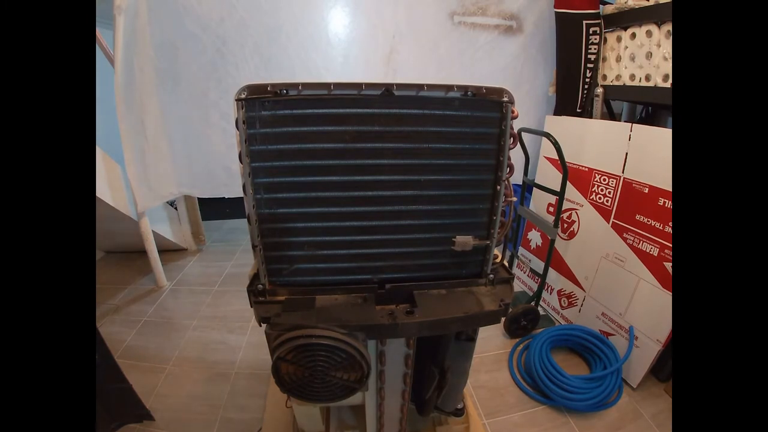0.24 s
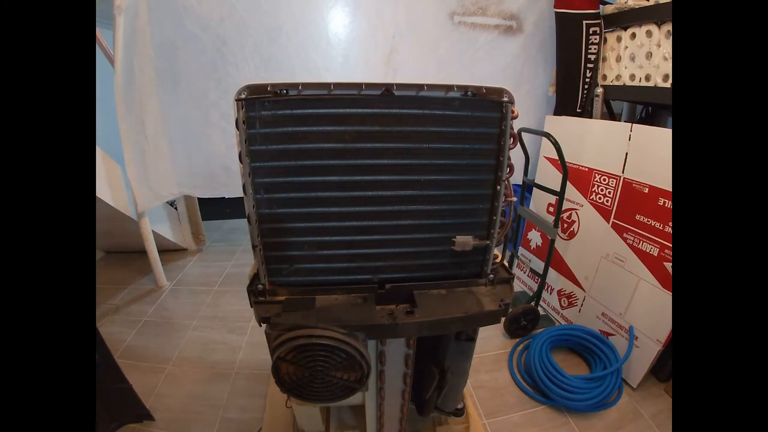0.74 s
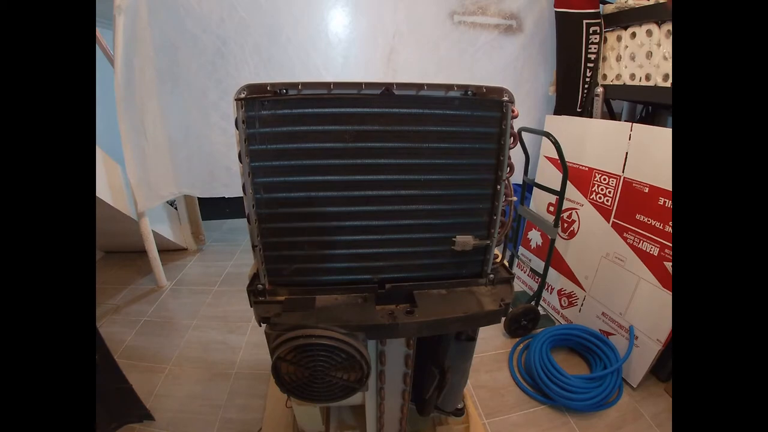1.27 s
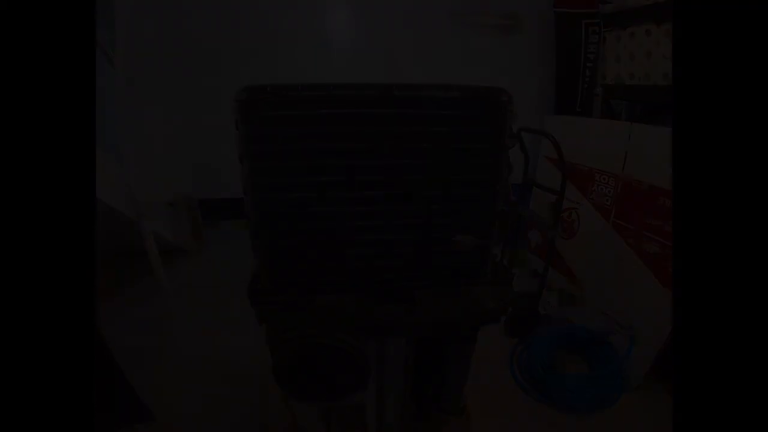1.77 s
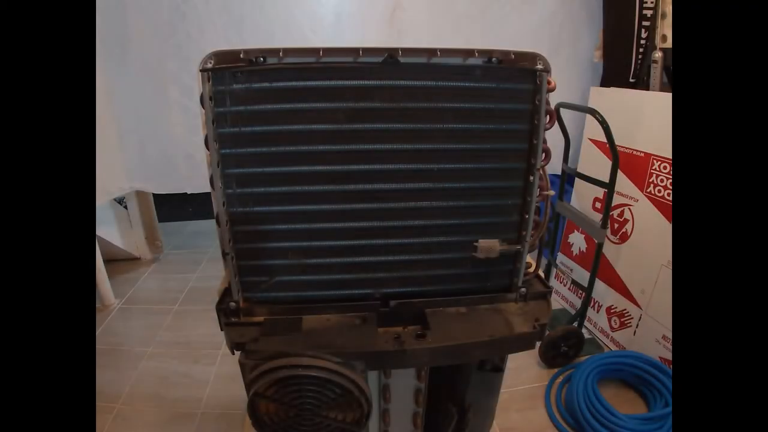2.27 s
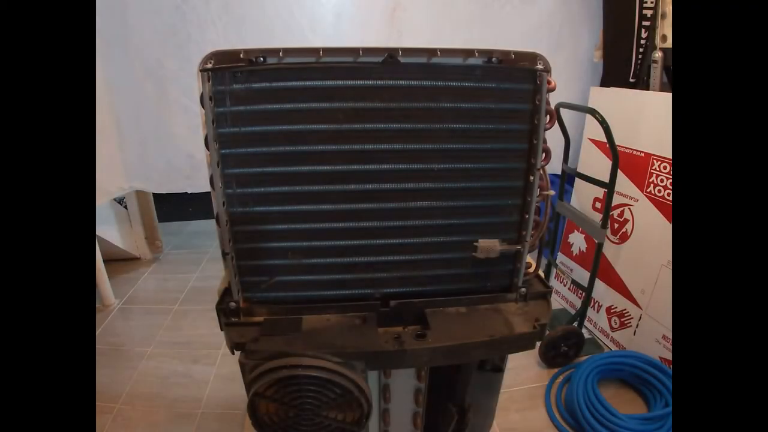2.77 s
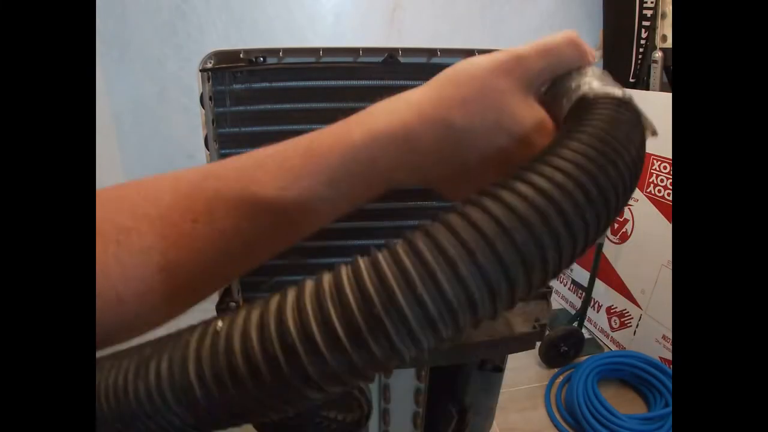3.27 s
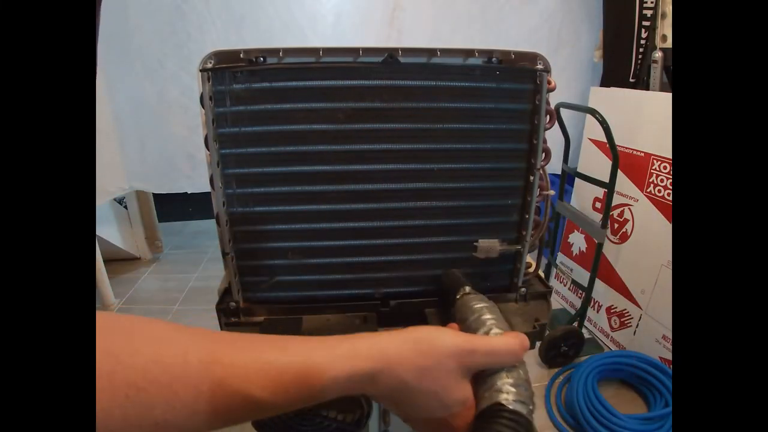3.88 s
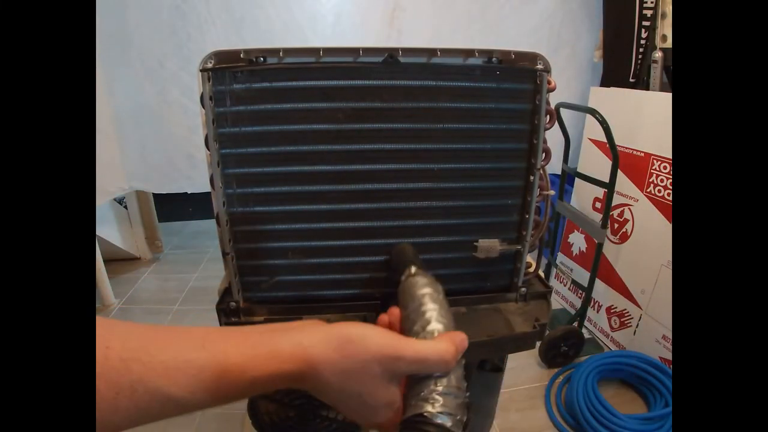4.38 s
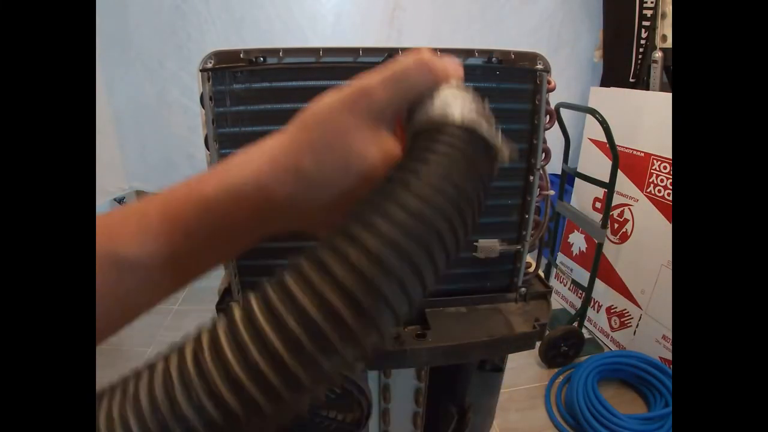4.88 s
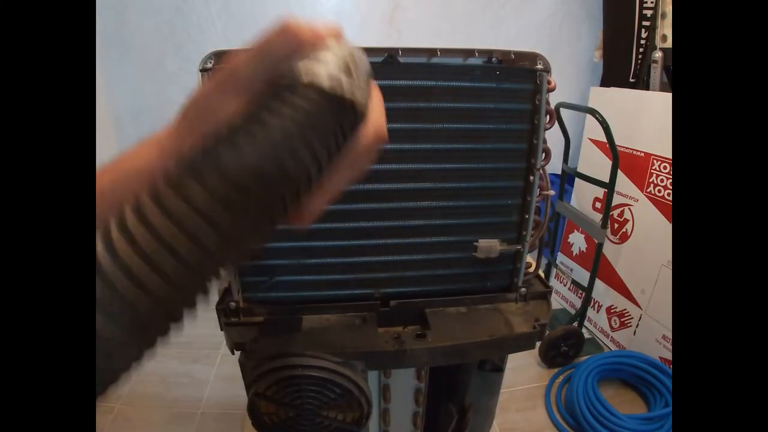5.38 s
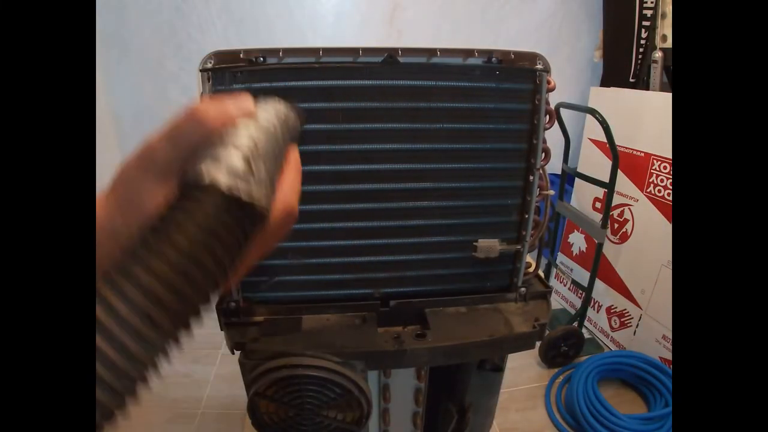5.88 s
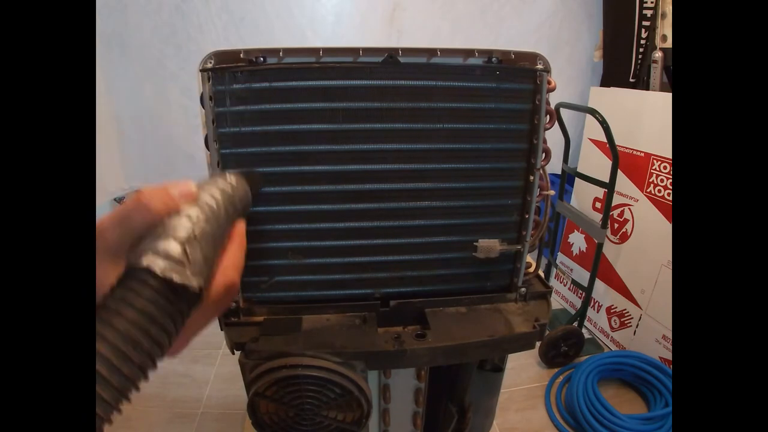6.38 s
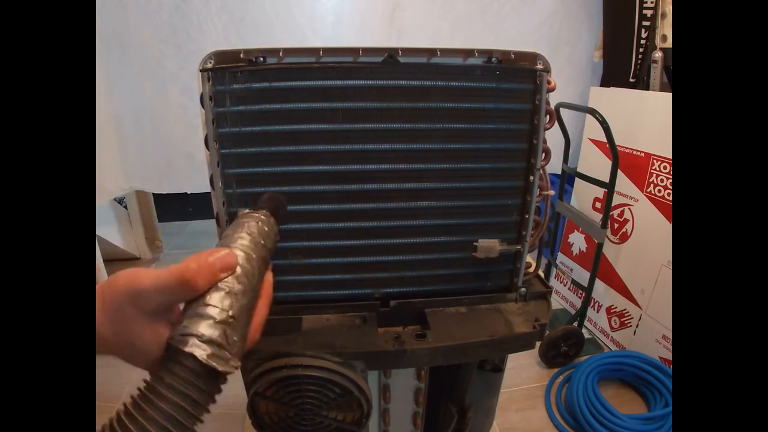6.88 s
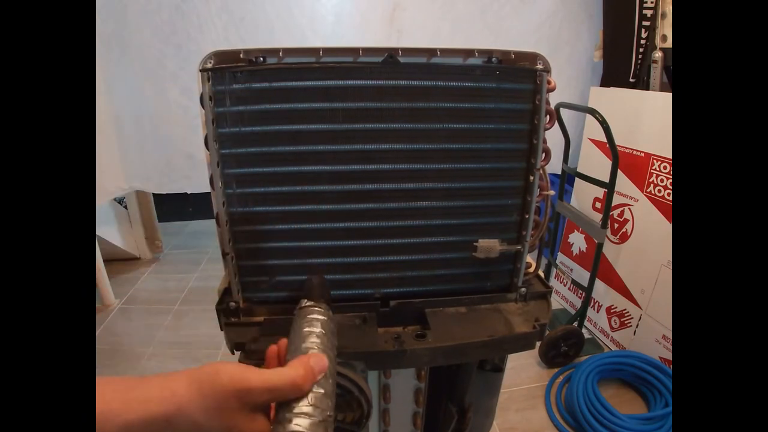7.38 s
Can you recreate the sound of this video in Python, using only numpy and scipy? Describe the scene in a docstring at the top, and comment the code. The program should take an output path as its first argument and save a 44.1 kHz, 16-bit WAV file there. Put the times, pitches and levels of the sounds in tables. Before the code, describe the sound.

A brief swish ends in the loud slam and rattle of a panel, ringing off the hard walls of a small workroom. Close scrapes, taps and thumps of fingers on the microphone follow, then a switch clicks and a wet/dry vacuum starts. Heard from close by, it runs on with a rush of air, a pulsing high whine and a thin whistle, while its hose flexes faintly and the nozzle knocks lightly on metal twice.

```python
"""A panel swishes over faint mains hum in a small hard-walled workroom, then bangs shut and rattles.
Right at the microphone, fingers scrape and tap the camera's shell; a switch snaps. A wet/dry vacuum
spins up and runs: its impeller whines with a slowing throb over the rush of air, which rings in the
hose and housing. The nozzle whistles and knocks, the hose flexes. One microphone, close by."""
import sys
import numpy as np
from scipy import signal
from scipy.fft import rfft, irfft
from scipy.io import wavfile
from scipy.ndimage import uniform_filter1d

SR = 44100
rng = np.random.default_rng(int(sys.argv[2]) if len(sys.argv) > 2 else 0)


def to_wav(s):
    """Save 16-bit WAV."""
    ch = np.atleast_2d(s).T  # columns
    pcm = np.round(np.clip(ch, -1, 1) * 32767)  # PCM
    wavfile.write(sys.argv[1], SR, pcm.astype(np.int16))


N = 336924
T = np.arange(N) / SR
FREQS = np.maximum(np.fft.rfftfreq(N, 1 / SR), 1)

# room tone, early and late: f/Hz, level/dB (every COLOUR is a relative noise spectrum)
EARLY_ROOM_COLOUR = [(25, -16), (60, -11.5), (110, -8.5), (180, -10.5), (300, -7), (580, -22.5), (800, -24),
                     (2500, -39), (5000, -34), (9000, -40.5), (14000, -58)]
LATE_ROOM_COLOUR = [(25, -14), (140, -24), (300, -16), (450, -18), (700, -7), (1400, -14), (2500, -35),
                    (15000, -22)]
# mains hum, early and late: f/Hz, level/dB
EARLY_HUM_LINES = [(59.2, -59.5), (174, -62.5), (296, -67)]
LATE_HUM_LINES = [(237, -70), (684, -74.5), (1034, -81)]

# swishes of the moving panel: t/s, level/dB, rise/s, t60/s
PANEL_SWISHES = [(.01, -62.5, .02, 1.0), (.24, -53.5, .06, 1.0), (.54, -49, .04, .5), (.82, -54, .04, .45),
                 (.93, -61, .03, .62)]
# the panel's swish and rattle: f/Hz, level/dB
SWISH_COLOUR = [(200, 8.5), (900, 3), (2000, -1.5), (3500, 1), (6000, -1), (9000, -2.5),
                (12000, -28.5), (15000, -30.5)]
RATTLE_COLOUR = [(80, -23), (220, -2), (750, -3), (1100, -18.5), (4000, -34.5), (12000, -54.5)]
# latch, slam and rebound: t/s, level/dB, t60/s
PANEL_BLOWS = [(.488, -40, 0.056), (0.537, -12.5, 0.042), (.577, -26, .04)]
# the direct crack, and its wash off the walls: f/Hz, level/dB
CRACK_COLOUR = [(25, -24), (60, -9), (280, -2.5), (700, -7.5), (1900, -6), (3300, -21.5), (4600, -11),
                (8300, -19), (11000, -42), (14000, -62)]
REVERB_COLOUR = [(40, -19.5), (95, -18), (125, -5), (150, -4.5), (280, -9), (420, -8), (650, -10),
                 (900, -14), (1900, -17), (3700, -27), (8000, -23.5), (11000, -40), (14000, -59)]
# decay of the room: f/Hz, t60/s
REVERB_DECAY = [(100, 0.78), (400, 0.68), (1000, 0.59), (2500, 0.62), (6000, 0.4), (12000, 0.31)]
# modes of the panel: f/Hz, level/dB, t60/s
PANEL_MODES = [(153.2, -18, 0.37), (144.6, -24.5, .75), (164.3, -30.5, 0.84), (244.6, -28, 0.32),
               (395, -32, 0.76), (484, -39.5, 0.41), (560, -26, .35), (682, -28.5, .4), (1015, -30, .26),
               (1470, -31.5, 0.27), (1900, -34.5, 0.5)]

# a finger catches twice, then slips: t/s, hold/s, level/dB
FINGER_SCRAPES = [(1.302, .002, -33), (1.311, .002, -29), (1.324, .019, -27.3)]
# fingers rub the camera: t/s, hold/s, rub level/dB, rumble level/dB
FINGER_RUBS = [(1.35, .06, -61, -45), (1.44, .34, -62.5, -50), (1.52, .02, -53, -37),
               (1.605, .03, -51, -37), (1.94, .03, -59.5, -58), (2.34, .02, -65, -85)]
# the grip presses the camera: t/s, level/dB
GRIP_PUSHES = [(1.5215, -23), (1.572, -25), (1.645, -21)]
# sliding skin, and handling rumble at the microphone: f/Hz, level/dB
SKIN_COLOUR = [(100, 0), (500, -18.5), (900, -6), (2000, -4), (2700, -8.5), (4000, 0.5), (6200, -5),
               (7500, -4), (10000, -9), (12000, -33), (15000, -31)]
RUMBLE_COLOUR = [(10, -2.5), (24, 9.5), (40, -1), (65, -10), (110, -13), (250, -19), (600, -34),
                 (2000, -70), (8000, -90)]
# taps on the shell: t/s, knock level/dB, tick level/dB, scuff level/dB, scuff t60/s
FINGER_TAPS = [(1.471, -54, -53, -70, .02), (1.509, -54, -41, -43.5, .05), (1.5713, -58, -33.5, -41, .022),
               (1.596, -39, -48, -47, .05), (1.628, -55, -46, -58, .02), (1.681, -50, -47, -48, .04),
               (1.717, -51, -39, -40, .02), (1.735, -64, -43, -64, .02), (1.762, -12.5, -36, -49, .02),
               (1.771, -58, -31.5, -49, .02), (1.807, -56, -46, -48.5, .07), (1.8348, -43, -51, -39, .038),
               (1.904, -46, -53, -38.5, .11), (2.126, -42, -40, -57, .025), (2.152, -66, -54, -58, .13)]
# modes of the camera's shell: f/Hz, level/dB, t60/s
SHELL_MODES = [(1323, -2, 0.033), (1150, -26, .03), (2490, -14, 0.017), (3300, -2.5, 0.0084),
               (5070, -8, 0.0089), (8500, -11, .005)]
# a tap's tick and scuff, and the switch's snap: f/Hz, level/dB
TICK_COLOUR = [(300, -8), (3000, -15), (5200, 3), (7500, -7), (15000, -13)]
SCUFF_COLOUR = [(40, 0), (140, 16.5), (400, 6.5), (700, 2.5), (1300, 5.5), (2200, -2.5), (4500, -3),
                (9000, -15.5), (14000, -34)]
SNAP_COLOUR = [(150, -32), (600, -3), (1200, -5), (2500, 1.5), (3400, -6), (5500, -5), (8200, -6),
               (12500, 2), (15500, -3)]

# the motor's jolt, its sparking brushes, and air through the machine: f/Hz, level/dB
JOLT_COLOUR = [(100, -28), (450, 13), (1400, 4), (3000, 1), (9000, -8), (15000, -12)]
SPARK_COLOUR = [(200, -22), (500, -3), (2000, -1), (5000, 6), (9000, 0), (15000, -0.5)]
AIR_COLOUR = [(30, -37), (100, -28), (170, -21.5), (300, -8.5), (520, -2.5), (800, 2), (1150, -0.5),
              (1450, 0.5), (2300, -3.5), (2900, -6), (4200, -7.5), (7000, -6.5), (9000, -8), (15500, -15)]
# resonances of hose and housing: f/Hz, width/Hz, lift/dB
DUCT_RESONANCES = [(310, 50, 4), (550, 26, 3), (707, 32, 6), (1454, 42, 6.5), (1710, 29, 4),
                   (2044, 124, 7.5), (2230, 56, 4), (2670, 40, 2.5), (3540, 40, 1), (3682, 67, 7.5),
                   (4025, 48, 8.5), (4280, 120, 10), (4770, 40, 3), (5050, 63, 11), (5280, 74, 7),
                   (5500, 35, 7), (6050, 55, 7.5), (6325, 90, 6.5), (6640, 84, 10.5), (7290, 80, 10.5),
                   (7520, 35, 7.5), (7870, 130, 5), (8290, 115, 9), (9370, 48, 4.5), (10200, 70, 4),
                   (11020, 120, 6), (12450, 210, 7), (15500, 90, -1)]
# hum of the running motor: f/Hz, level/dB
MOTOR_LINES = [(238.5, -63.5), (479.5, -56.5)]
# throb of the whine: t/s, rate/Hz
THROB_RATE = [(3.0, 20.43), (3.5, 14.54), (4.1, 9.09), (4.8, 6.61), (5.5, 6.01), (6.6, 7.08), (7.6, 7.57)]
# the nozzle's thin whistle: f/Hz, width/Hz, relative level/dB
WHISTLE_PARTIALS = [(7340, 30, -1), (7280, 70, -2), (14060, 70, -6.5), (15500, 90, -13)]
# the nozzle knocks on metal: t/s, level/dB
NOZZLE_KNOCKS = [(7.006, -27), (7.421, -30)]
# modes of the nozzle: f/Hz, level/dB, t60/s
NOZZLE_MODES = [(839, -6.5, .05), (948, 0, 0.076), (1030, -7, 0.049)]
# lone flexes of the hose: t/s, level/dB
HOSE_FLEXES = [(3.2, -60), (4.59, -50.5), (4.63, -53.5), (6.929, -62)]
# the hose's soft bump: f/Hz, level/dB
HOSE_COLOUR = [(40, -22), (110, -16), (150, -3.5), (195, 6.5), (260, -13), (600, -51), (2000, -80)]

MOTOR_START_S, SPIN_UP_S = 2.372, .052
MOTOR_AGE = np.maximum(T - MOTOR_START_S, 0)


def undb(db):
    """Decibels to gain."""
    return 10 ** (np.asarray(db) / 20)


def unit(x):
    """Scale to rms 1."""
    return x / np.sqrt(np.mean(x ** 2))


def colour(points, hz=FREQS):
    """Values of an (f/Hz, value) table on a log-frequency axis."""
    f, value = np.transpose(points)
    return np.interp(np.log(hz), np.log(np.maximum(f, 1)), value)


def noise(points, peaks=(), ripple_db=0):
    """Noise of rms 1 with a broad colour and resonant peaks (f/Hz, width/Hz, lift/dB)."""
    lift = sum(db / (1 + (2 * (FREQS - hz) / width) ** 2) for hz, width, db in peaks)
    return unit(irfft(rfft(rng.standard_normal(N)) * undb(colour(points) + lift + ripple_db), N))


def walk(rate, size=N):
    """Smooth random drift of rms 1, with rate new values a second."""
    step = SR / rate
    knots = rng.standard_normal(int(size / step) + 2)
    joined = np.interp(np.arange(size) / step, np.arange(len(knots)), knots)
    return unit(uniform_filter1d(joined, int(step / 2) + 1))


def fade(start, t60):
    """Sudden onset, then an exponential decay."""
    return (T >= start) * np.exp(-np.log(1000) * np.clip((T - start) / t60, 0, 2))


def swell(peak, rise, t60, hold=0):
    """A smooth rise to a peak, a hold, then an exponential release."""
    release = np.log(1000) * np.maximum(T - peak - hold, 0) / t60
    return np.exp(-(np.minimum(T - peak, 0) / rise) ** 2 - release)


def bump(at, length):
    """A short rounded pulse."""
    return np.exp(-((T - at) / length) ** 2)


def ring(start, modes):
    """Damped modes struck at one moment; neighbours swing opposite ways."""
    t = np.arange(SR) / SR
    tone = sum((-1) ** k * undb(db) * np.exp(-np.log(1000) * t / t60) * np.sin(2 * np.pi * hz * t)
               for k, (hz, db, t60) in enumerate(modes))
    return np.pad(tone, (int(start * SR), N))[:N]


def hum(lines, waver_db):
    """Tones of steady pitch whose levels waver by waver_db."""
    return sum(np.sqrt(2) * undb(db + waver_db * walk(8.3)) * np.sin(2 * np.pi * (hz * T + rng.random()))
               for hz, db in lines)


def room_tone():
    """Faint air and mains hum in the workroom; the low hum gives way to a thinner one."""
    blend = np.clip((T - 1.85) / 0.29, 0, 1)
    early = undb(-61.5) * noise(EARLY_ROOM_COLOUR) + hum(EARLY_HUM_LINES, waver_db=3)
    late = undb(-68) * noise(LATE_ROOM_COLOUR) + hum(LATE_HUM_LINES, waver_db=1)
    return (1 - blend) * early + blend * late


def panel_slide():
    """The panel swishes drily as it moves, and rattles hollowly after the slam."""
    swish = noise(SWISH_COLOUR, peaks=[(1950, 300, 9)])
    rattle = noise(RATTLE_COLOUR, peaks=[(400, 60, 8), (730, 100, 8)])
    sliding = np.max([undb(db) * swell(s, rise, t60) for s, db, rise, t60 in PANEL_SWISHES], axis=0)
    shaking = undb(-41) * swell(.66, rise=.11, t60=.3, hold=.11)
    return sliding * undb(1.2 * walk(90)) * swish + shaking * undb(1.3 * walk(70)) * rattle


def panel_bang():
    """A latch ticks, the panel slams, rings and rebounds; the hard walls answer, the bass longest."""
    slam_s = PANEL_BLOWS[1][0]
    crack = noise(CRACK_COLOUR) * sum(undb(db) * fade(s, t60) for s, db, t60 in PANEL_BLOWS)
    wash, reverb = rfft(noise(REVERB_COLOUR)), 0
    for hz in 62.5 * 2. ** np.arange(9):
        octave_band = irfft(wash * np.clip(1 - abs(np.log2(FREQS / hz)), 0, 1), N)
        reverb += octave_band * fade(slam_s + .003, colour(REVERB_DECAY, hz))
    return crack + undb(-23) * reverb + undb(-1) * ring(slam_s, PANEL_MODES)


def finger_handling():
    """Skin sticks and slips on the shell, which rings; the grip shakes and presses the microphone."""
    strokes = [undb(db) * swell(s, rise=.004, t60=.045, hold=hold) for s, hold, db in FINGER_SCRAPES]
    scrape = np.max(strokes, axis=0) * undb(walk(700)) * noise(SKIN_COLOUR, peaks=[(1290, 350, 16.8)])
    # a firm grip rings the shell; a loose one only hisses
    firm = np.interp(T, [1.96, 2.0], [1, 0])
    friction = firm * noise(SKIN_COLOUR, peaks=[(1330, 730, 24.5)]) + (1 - firm) * noise(SKIN_COLOUR)
    rubs = [undb(db) * swell(s, rise=.025, t60=.35, hold=hold) for s, hold, db, _ in FINGER_RUBS]
    shakes = [undb(db) * swell(s, rise=.025, t60=.85, hold=hold) for s, hold, _, db in FINGER_RUBS]
    rub = np.max(rubs, axis=0) * undb(2 * walk(200)) * friction
    rumble = np.max(shakes, axis=0) * noise(RUMBLE_COLOUR)
    thumps = sum(undb(db) * bump(s, length=.01) for s, db in GRIP_PUSHES)
    return scrape + rub + rumble + thumps


def finger_taps():
    """Right at the microphone, each tap knocks the shell, ticks sharply and scuffs off."""
    tick, scuff = noise(TICK_COLOUR), noise(SCUFF_COLOUR)
    return sum(undb(knock_db) * ring(s, SHELL_MODES)
               + undb(tick_db) * tick * fade(s, t60=.0047)
               + undb(scuff_db) * scuff * fade(s, t60)
               for s, knock_db, tick_db, scuff_db, t60 in FINGER_TAPS)


def switch_snap():
    """A bright snap with a softer second contact."""
    return noise(SNAP_COLOUR) * (undb(-31.5) * fade(2.1995, t60=.12) + undb(-41) * fade(2.218, t60=.09))


def motor(speed):
    """The motor jolts as the current arrives, its brushes spark while that is high, and it hums on."""
    jolt = undb(-41) * fade(MOTOR_START_S, t60=.34) * noise(JOLT_COLOUR)
    inrush = (MOTOR_AGE / .07) ** 2 * np.exp(2 - 2 * MOTOR_AGE / .067)
    sparks = undb(-30.5) * noise(SPARK_COLOUR) * inrush
    return jolt + sparks + speed * hum(MOTOR_LINES, waver_db=0)


def air_rush(speed):
    """Air rings in hose and housing; a near reflection shifts its colour as the hand moves."""
    # many weak standing waves in the hose ripple the spectrum
    standing_db = 1.25 * walk(220, size=len(FREQS))
    direct = noise(AIR_COLOUR, DUCT_RESONANCES, standing_db)
    lag_s = .004 + .000298 * walk(2)
    reflection = undb(-16.5) * np.interp(T - lag_s, T, direct)
    level_db = -34.1 + .18 * MOTOR_AGE + .6 * walk(14)
    return unit(direct + reflection) * undb(level_db) * speed ** .75


def impeller_whine(speed):
    """The impeller's blade tone and its overtones; pitch and level throb together."""
    throb_hz = np.interp(T, *np.transpose(THROB_RATE))
    throb = 2 * np.pi * np.cumsum(throb_hz * (T > THROB_RATE[0][0])) / SR
    depth = np.clip((T - 2.94) / .09, 0, 1)
    throb_db = depth * (1 + .074 * throb_hz)  # deeper while it is fast
    # the pitch creeps up to full speed, and sags once as the hose is lifted
    blade_hz = 1564.5 - 6 * np.exp(-(MOTOR_AGE / 1.7) ** 2) - 10 * bump(3.05, length=.09)
    hz = speed * (blade_hz + 4.5 * depth * np.cos(throb + 2.1) + .76 * walk(25))
    phase = 2 * np.pi * np.cumsum(hz) / SR
    # on the way up the tone sweeps through a dip and two resonances of the housing
    housing_db = (-6 / (1 + ((hz - 1270) / 70) ** 2)
                  + 5 / (1 + ((hz - 1400) / 35) ** 2)
                  + 7 / (1 + ((hz - 1487) / 24) ** 2))
    blade = undb(throb_db * np.cos(throb) + housing_db) * np.sin(phase + .064 * walk(130))
    flare_db = 7 * swell(2.85, rise=.2, t60=2.5)
    octave_db = -18.5 + flare_db + throb_db * np.cos(throb - 2.5) + .6 * walk(5) + 1.6 * walk(35)
    octave = undb(octave_db) * np.sin(2 * phase + .27 * walk(60))
    third = undb(-28.5 + 3.8 * walk(12)) * np.sin(3 * phase + .5 * walk(60))
    overtones = speed ** 25 * (octave + third)  # they only speak near full speed
    # the level builds after the start, then eases off
    level_db = -28.3 - 3 * np.exp(-(MOTOR_AGE / .35) ** 2) - .3 * MOTOR_AGE + .5 * walk(120)
    return np.sqrt(2) * undb(level_db) * speed ** 1.9 * (blade + overtones)


def nozzle():
    """Air whistles unsteadily over the nozzle's edge; the nozzle knocks lightly on metal."""
    whistle = sum(undb(db) * walk(width) * np.sin(2 * np.pi * hz * T + walk(width))
                  for hz, width, db in WHISTLE_PARTIALS)
    blowing = undb(-47.5) * (1 - np.exp(-MOTOR_AGE / 1.8))
    knocks = sum(undb(db) * ring(s, NOZZLE_MODES) for s, db in NOZZLE_KNOCKS)
    return blowing * unit(whistle) + knocks


def hose_bumps():
    """Each flex of the hose, and each rib dragged ever slower over an edge, gives a soft low bump."""
    drag_s, gap_s, slowing_s = 4.925, .128, .0017
    ribs = [(drag_s + gap_s * k + slowing_s * k ** 2, -56 + 1.5 * rng.standard_normal())
            for k in range(12)]
    flexing = sum(undb(db) * bump(s, length=.021) for s, db in HOSE_FLEXES + ribs)
    return flexing * noise(HOSE_COLOUR)


def scene():
    """The workroom from one close microphone, alike in both channels."""
    mono = room_tone() + panel_slide() + panel_bang() + finger_handling() + finger_taps() + switch_snap()
    speed = 1 - np.exp(-MOTOR_AGE / SPIN_UP_S)  # fraction of the vacuum's full speed
    mono += motor(speed) + air_rush(speed) + impeller_whine(speed) + nozzle() + hose_bumps()
    return np.array([mono, mono])


def record(dry):
    """The camera cuts the top steeply above 15750 Hz."""
    return signal.sosfilt(signal.ellip(12, .1, 80, 15750, fs=SR, output="sos"), dry)


dry = scene()
out = record(dry)
to_wav(out)
```